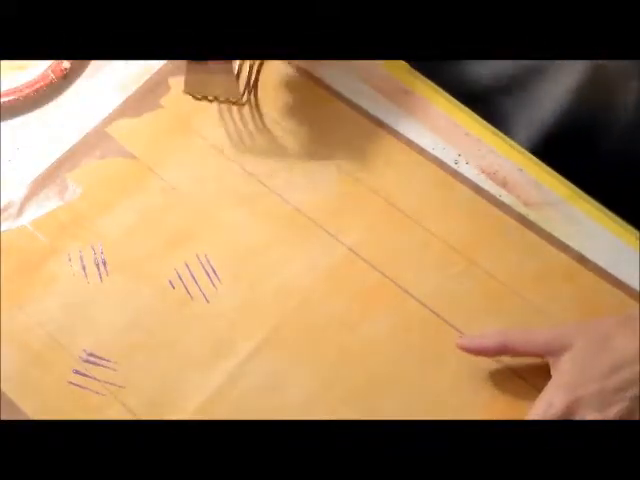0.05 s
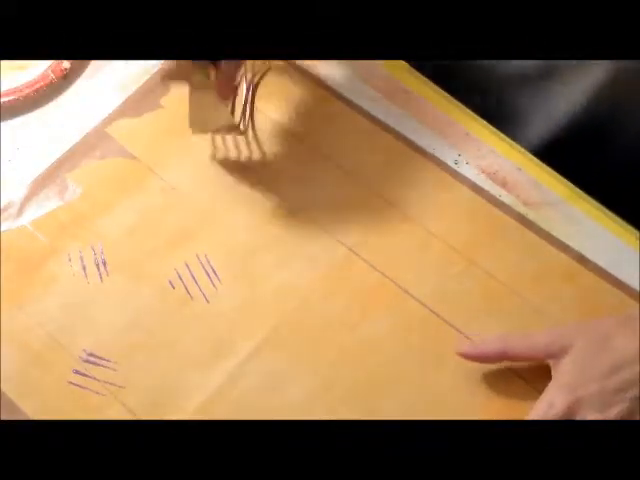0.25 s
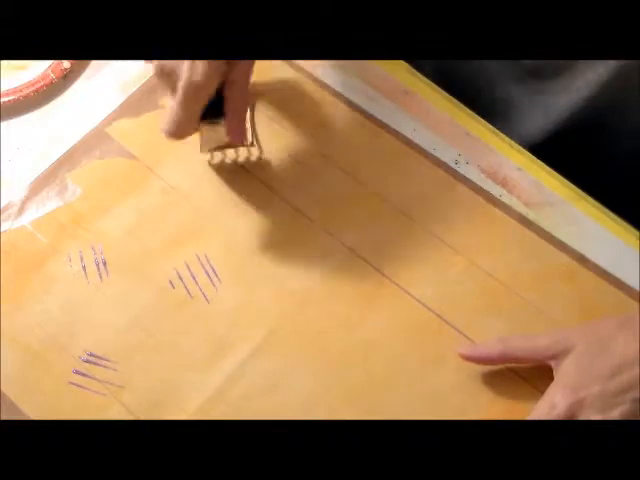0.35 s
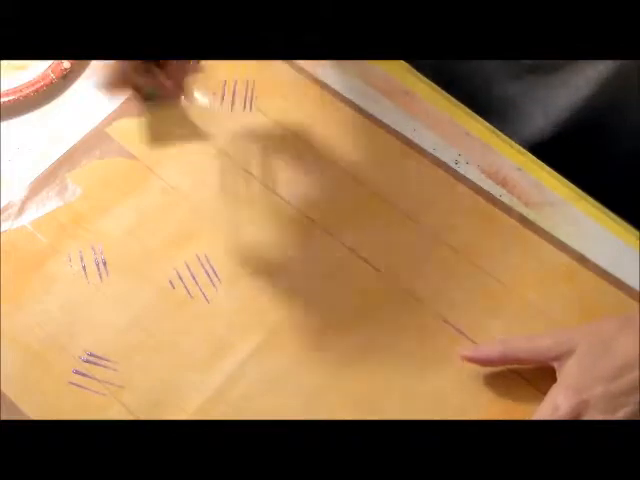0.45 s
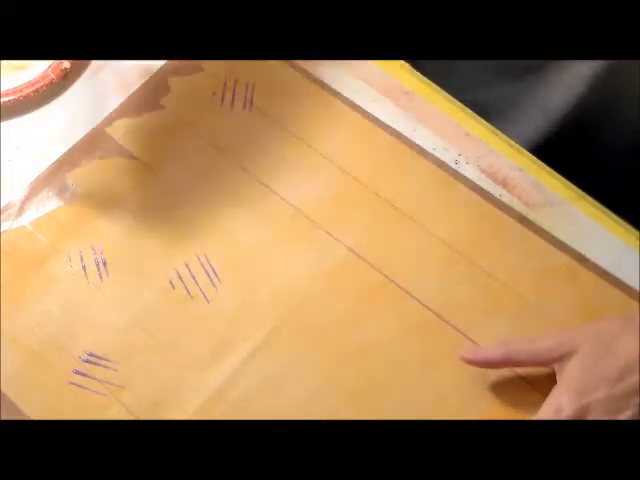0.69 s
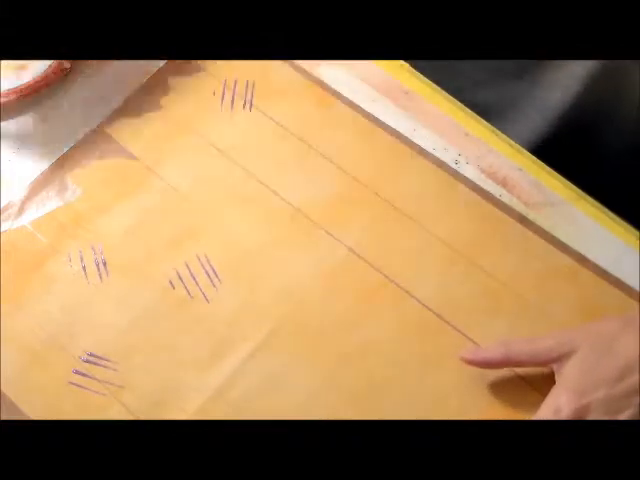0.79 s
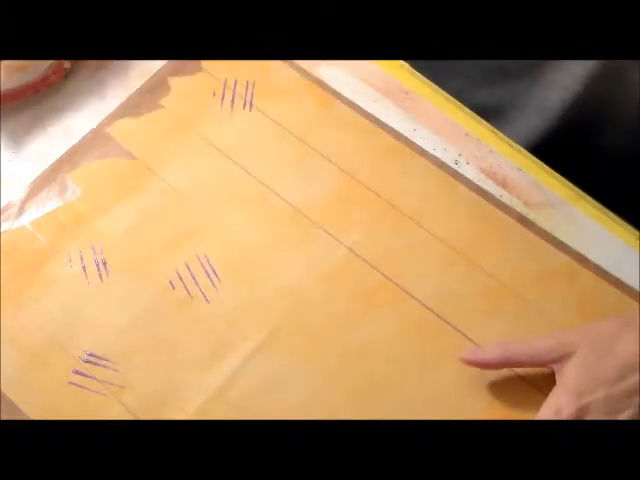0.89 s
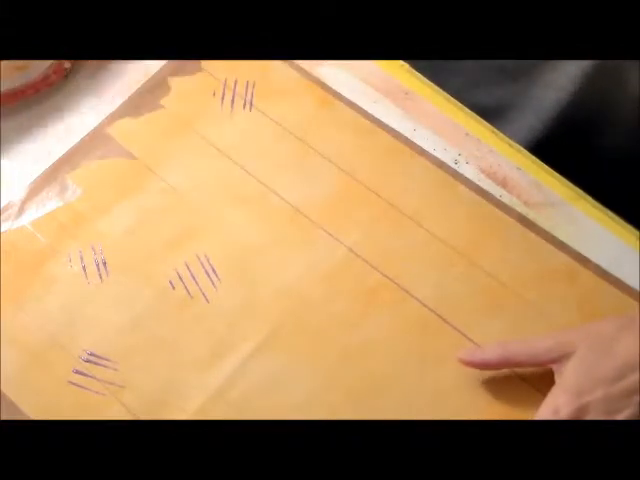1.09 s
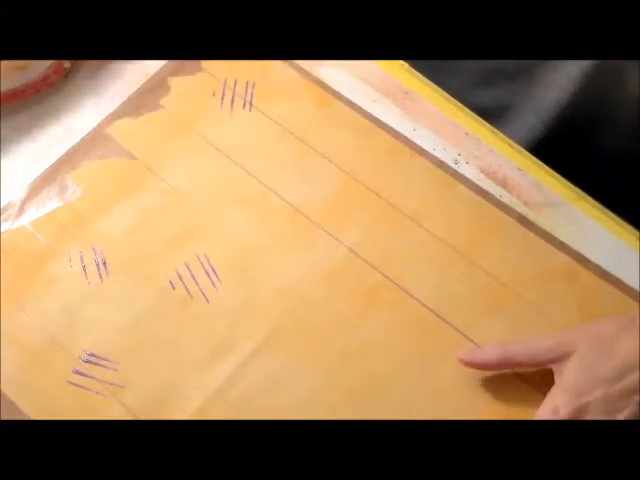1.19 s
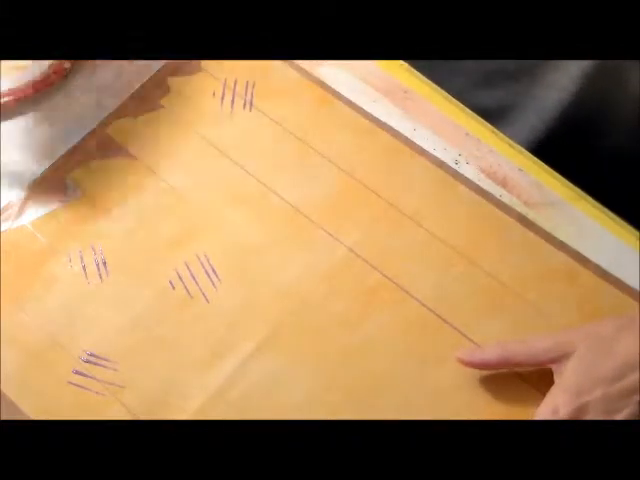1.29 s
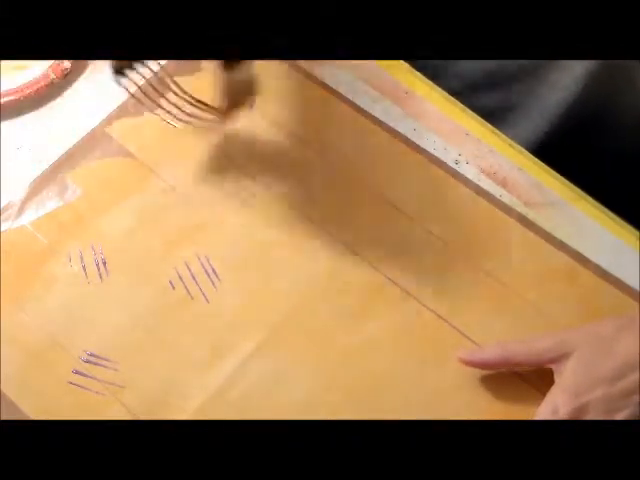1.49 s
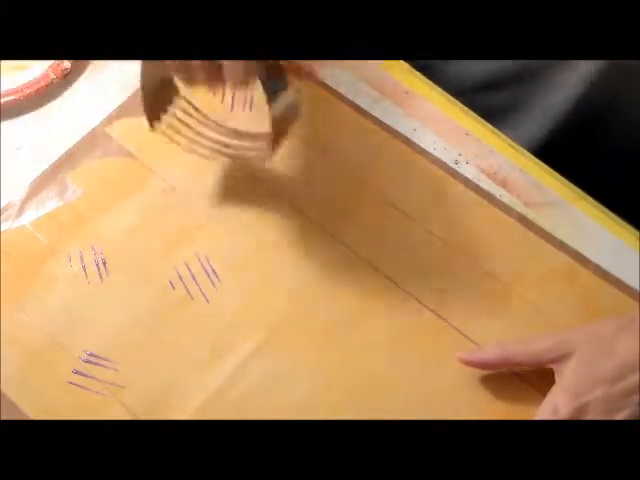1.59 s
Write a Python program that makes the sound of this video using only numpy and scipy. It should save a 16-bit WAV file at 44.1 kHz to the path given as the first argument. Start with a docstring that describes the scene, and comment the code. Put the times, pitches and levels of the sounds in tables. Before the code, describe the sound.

A metal hand tool with tines strikes a paper-covered table: a dull thump, small scattered ticks, then two sharper clattering blows close together, in a small room, miked close with camera hiss and motor chirps.

```python
"""From the start a camera adds hiss and rumble (shaped noise), hum, a thin sagging whine and short motor chirps.
At 0.21 s a metal hand tool is set down on a paper-covered table in a small room: the table thumps and rings.
Tines tick on the paper just before and after it (clicks with a little noise); the paper rustles (grainy noise).
Two more blows, at 1.09 s and 1.32 s, add the clatter of the tines, made of dying sine waves and noise.
The camera's gain control turns the sound down after the loud blows and lets it recover slowly."""
import sys
import numpy as np
from scipy import signal
from scipy.fft import rfft, irfft
from scipy.io import wavfile
from scipy.ndimage import uniform_filter1d

SR = 44100
rng = np.random.default_rng(int(sys.argv[2]) if len(sys.argv) > 2 else 0)


def materialize(psi):
    """Save the field psi as 16-bit PCM at rate SR to the path in sys.argv[1].

    A 1-D psi becomes a single channel; in a 2-D psi each row is a channel.
    """
    bounded = np.clip(np.atleast_2d(psi).T, -1, 1)
    quanta = np.round(bounded * 32767).astype(np.int16)
    wavfile.write(sys.argv[1], SR, quanta)


def gain_from_db(level_db):
    """Convert decibel levels to linear amplitude factors (20 dB per decade)."""
    decades = np.asarray(level_db, float) / 20
    return 10 ** decades


N = 72765  # length of the scene in samples

# Colour of hiss and rumble: (frequency [Hz], relative level [dB])
AIR_COLOUR = [(12, -13.5), (20, 5), (54, -8), (191, -14), (231, -22), (331, -17), (557, -28), (605, -25.5),
              (1080, -29.5), (5170, -33.5), (14300, -39)]
# How alike the hiss is in both ports: (frequency [Hz], likeness [-1 to 1])
AIR_LIKENESS = [(60, 1), (130, 0.15), (290, 0.26), (640, 0.44), (1400, 0.25), (3090, -0.059), (6790, -0.19),
                (14900, 0.29)]
# Balance of the hiss: (frequency [Hz], left minus right [dB])
AIR_BALANCE = [(60, 10), (110, 11.5), (200, -2), (380, 2), (700, -0.5), (1290, -0.5), (2370, -0.5),
               (4380, 3.5), (8090, -0.5), (14900, 1)]
AIR_DB, AIR_EDGE_HZ = -49.5, 14300  # the hiss stops at the edge

# Wavering low hum lines: (frequency [Hz], level [dB], width of the narrower of two resonances [Hz])
HUM_LINES = [(420, -77, 5.5), (148.6, -66.5, 6), (197, -77, 35), (275.3, -71, 32)]
# Loudness of a steadier hum line: (time [s], level [dB])
DRONE_LEVEL = [(0, -82), (.3, -71), (.65, -66), (.8, -63), (1.05, -61), (1.3, -69), (1.5, -79),
               (1.65, -111)]
DRONE_HZ, DRONE_WAVER_HZ = 339.2, 1.6

# Stretches of whine: (start [s], end [s], level [dB])
WHINES = [(0.033, 0.24, -76), (0.267, .36, -77), (0.645, 1.02, -73.5)]
WHINE_START_HZ, WHINE_SAG_HZ_PER_S, WHINE_WAVER_HZ = 5365, 190, 8

# Motor steps: (time [s], level [dB])
MOTOR_STEPS = [(0.0336, -56.5), (0.1476, -82), (0.286, -63.5), (0.4312, -58), (0.901, -57), (0.9662, -60.5),
               (1.033, -59), (1.1667, -63), (1.2333, -58), (1.634, -58)]
# The tones in one chirp: (frequency [Hz], level against the step [dB], length [s])
CHIRP_TONES = [(2886, 4, 0.015), (3850, -4.5, 0.044)]

# Light ticks of single tines:
# (time [s], level before an 8 dB lift [dB], centre [Hz], width of the narrower of two resonances [Hz])
TINE_TICKS = [(0.2051, -44.5, 3580, 1430), (0.213, -45, 3630, 900), (0.4158, -56, 3960, 2500),
              (0.4534, -54, 5000, 6400), (0.5302, -47.5, 4400, 1070), (0.5936, -43, 3230, 790),
              (0.5932, -50, 2560, 500), (.5943, -44, 4400, 1240), (0.596, -50, 1700, 780),
              (0.6029, -42, 2600, 1800), (0.6325, -45, 2980, 600), (0.6325, -46, 4130, 1500),
              (.648, -39.5, 13600, 5900), (1.088, -46, 3400, 2490), (1.1863, -51, 3300, 700)]
TICK_FADE_S = 0.0021  # for a tick at 3500 Hz; higher ticks fade faster
TICK_GRIT = 0.29  # noise that follows the first contact

# Blows on the table: (time [s], thump [dB], knock [dB], clatter [dB], board tuning [ratio])
TABLE_BLOWS = [(0.2117, -22, -29, -64, .95), (1.0926, -22.5, -32, -31.5, 1.),
               (1.3184, -18, -22.5, -30, 1.02)]
# Table rocking on its legs: (frequency before tuning [Hz], level against the thump [dB], time to fall 60 dB [s])
ROCKING_MODES = [(46.5, 5, 0.21), (32.17, -9, 0.79), (66, -2, 0.19)]
ROCKING_RISE_S, ROCKING_CREST_S = 0.02, 0.0193  # build-up time; shared crest, counted from the blow
# Table frame: (frequency before tuning [Hz], level against the knock [dB], time to fall 60 dB [s])
FRAME_MODES = [(121, -0.5, 0.176), (185, -1, 0.1), (215.9, -6.5, 0.24)]
# Table top: (frequency before tuning [Hz], level against the knock [dB], time to fall 60 dB [s])
BOARD_MODES = [(364, -5, 0.033), (441.6, -0.5, 0.089), (554, -11.5, 0.076), (650, -17.5, 0.1),
               (759.4, -14.5, 0.14), (1132, -13, 0.052)]
# Colour of the dull part of the knock: (frequency [Hz], relative level [dB])
KNOCK_COLOUR = [(150, -14), (250, -7.5), (443, 3), (563, -7.5), (1270, -12), (1550, -13), (2180, -15.5),
                (6000, -39), (7800, -74), (13200, -120)]
KNOCK_SNAP_DB, KNOCK_SNAP_T60_S = -10.5, 0.24
# The tool, damped by the paper:
# (frequency before tuning [Hz], level before strike strength [dB], time to fall 60 dB [s])
TINE_MODES = [(1896, -1.5, .02), (2430, -28, 0.023), (3325, 7, 0.018), (4400, 1.5, 0.034),
              (4760, -4, 0.031), (8560, -12.5, 0.035), (9650, -6, .012)]
CLATTER_FADE_S, CLATTER_PER_S, CRACK_DB = 0.0035, 1800, 1.5  # the tines land one after another
FIRST_TINE, FIRST_TINE_S = 0.83, 0.001301  # strength and delay of the leading tine
# Colour of the broad snap of paper and metal: (frequency [Hz], relative level [dB])
CRACK_COLOUR = [(290, -63), (500, -3), (900, -30.5), (1690, -7), (1980, -13.5), (3460, -13), (6510, -22.5),
                (10000, -15.5), (13300, -19.5), (15400, -66)]

# Pitched after-rings, some time after a blow: (start [s], length [s], frequency [Hz], level [dB])
AFTER_RINGS = [(.255, 0.031, 420, -44), (1.115, 0.051, 443, -41.5), (1.348, 0.073, 463, -37.5),
               (1.42, 0.15, 501, -59.5)]
# Paper settling: (start [s], length [s], level [dB])
PAPER_RUSTLES = [(1.184, 0.038, -53), (.415, 0.068, -59.5)]
# Soft low bump as the tool lifts: (start [s], length [s], frequency [Hz], level [dB])
LIFT_BUMPS = [(.435, 0.091, 66.3, -43)]

THUMP_LEAN_DB, FRAME_LEAN_DB, KNOCK_LEAN_DB = 11.5, 7, 1.1  # left minus right
RIGHT_LAG_S, THUMP_LAG_S = 0.000022, 0.00086  # the thump comes through the mount, unevenly

# How long the room echoes: (frequency [Hz], time to fall 60 dB [s])
ROOM_DECAY = [(250, 0.46), (660, 0.28), (1740, 0.18), (4590, 0.22), (12100, 0.16)]
ROOM_DB, ROOM_LIKENESS = -0.5, 0.66  # send level of the clatter; how alike the echoes are left and right
METAL_ROOM_DB = -11  # the damped tine ring stays near the table; the snap fills the room
TICK_ROOM_DB, KNOCK_ROOM_DB = -14, -14.5
GAIN_KNEE_DB, GAIN_SHARE, GAIN_RECOVERY_DB_PER_S, GAIN_SMOOTH_S = -28, 0.85, 4, 0.13
BAND_EDGE_HZ = 15300


def evened(x):
    """Brings a sound to an average (RMS) level of 1."""
    return x / np.sqrt(np.mean(x ** 2) + 1e-20)


def read(points, hz):
    """Reads a curve between its points, on a logarithmic frequency scale."""
    f, value = np.transpose(points)
    return np.interp(np.log(hz + 1), np.log(f + 1), value)


def add(mix, s, sound):
    """Adds a sound into the mix, starting at s seconds."""
    part = mix[round(s * SR):][:len(sound)]
    part += sound[:len(part)]


def resonate(x, hz, width):
    """A resonance of gain 1: it lets through the sound near one pitch."""
    turn = np.exp(2j * np.pi * np.cumsum(hz * np.ones(len(x))) / SR)
    r = np.exp(-np.pi * width / SR)
    return 2 * (turn * signal.lfilter([1 - r], [1, -r], x / turn)).real


def coloured(x, points):
    """Shapes a sound by a spectrum in dB."""
    hz = np.fft.rfftfreq(x.shape[-1], 1 / SR)
    return irfft(rfft(x) * gain_from_db(read(points, hz)), x.shape[-1])


def air():
    """Steady hiss over lumpy rumble: coloured noise, partly shared by the two ports."""
    hz = np.fft.rfftfreq(N, 1 / SR)
    a, b = rfft(rng.standard_normal((2, N)))
    same = np.clip(read(AIR_LIKENESS, hz), -1, 1)
    lean = gain_from_db(read(AIR_BALANCE, hz) / 2)  # half up on the left, half down on the right
    left = a * lean
    right = (same * a + np.sqrt(1 - same ** 2) * b) / lean
    colour = gain_from_db(read(AIR_COLOUR, hz)) / (1 + (hz / AIR_EDGE_HZ) ** 150)
    both = irfft(np.array([left, right]) * colour, N)
    return gain_from_db(AIR_DB) * both / np.sqrt(np.mean(both.mean(0) ** 2))


def slow_waver():
    """Twice-smoothed noise that makes a pitch wander."""
    return evened(uniform_filter1d(uniform_filter1d(rng.standard_normal(N), 900), 900))


def camera_hum(waver):
    """Low hum: noise through narrow resonances, plus a steadier sine that swells and fades."""
    t = np.arange(N) / SR
    drone = np.sin(2 * np.pi * np.cumsum(DRONE_HZ + DRONE_WAVER_HZ * waver) / SR)
    out = gain_from_db(np.interp(t, *np.transpose(DRONE_LEVEL))) * evened(drone)
    for hz, db, width in HUM_LINES:
        line = resonate(resonate(rng.standard_normal(N), hz, width), hz, 2 * width)
        out += gain_from_db(db) * evened(line)
    return out


def camera_whine(waver):
    """A thin sine whose pitch sags and wavers, faded at both ends of each stretch."""
    out, t = np.zeros(N), np.arange(N) / SR
    for start, end, db in WHINES:
        hz = WHINE_START_HZ - WHINE_SAG_HZ_PER_S * (t - start) + WHINE_WAVER_HZ * waver
        tone = evened(np.sin(2 * np.pi * np.cumsum(hz) / SR))
        fade = np.clip(np.minimum(t - start, end - t) / 0.0061, 0, 1)
        out += gain_from_db(db) * tone * fade
    return out


def motor_chirps():
    """Each motor step is a pair of short sines that swell quickly and then fade."""
    out = np.zeros(N)
    for s, db in MOTOR_STEPS:
        for hz, part_db, length in CHIRP_TONES:
            t = np.arange(0, length, 1 / SR)
            swell = np.sin(np.pi * (t / length) ** 0.2)
            add(out, s, gain_from_db(db + part_db) * swell * np.sin(2 * np.pi * hz * t))
    return out


def tine_ticks():
    """A tine touching paper: a click and a little noise through two resonances at one pitch."""
    out, t = np.zeros(N), np.arange(600) / SR
    for s, db, hz, width in TINE_TICKS:
        contact = TICK_GRIT * rng.standard_normal(len(t)) + (t == 0)
        burst = contact * np.exp(-t / TICK_FADE_S * np.sqrt(hz / 3500))
        tick = resonate(resonate(burst, hz, width), hz, 2 * width)
        add(out, s, gain_from_db(db + 8) * tick / abs(tick).max())
    return out


def ring(modes, tuning, crest_s=None):
    """The dying modes of a struck thing, starting from rest or all cresting at crest_s."""
    t = np.arange(SR // 2) / SR
    out = np.zeros(len(t))
    for hz, db, t60 in modes:
        pitch = hz * tuning
        crest = crest_s or 1 / (4 * pitch)  # a quarter turn makes the mode start from rest
        out += gain_from_db(db - 60 * t / t60) * np.cos(2 * np.pi * pitch * (t - crest))
    return out


def table_thump():
    """Each blow rocks the table on its legs; the low modes build up and die away."""
    out, t = np.zeros(N), np.arange(SR // 2) / SR
    for s, thump_db, _, _, _ in TABLE_BLOWS:
        rise = 1 - np.exp(-t / ROCKING_RISE_S)
        add(out, s, gain_from_db(thump_db) * ring(ROCKING_MODES, 0.93, ROCKING_CREST_S) * rise)
    return out


def frame_ring():
    """Each blow makes the table frame ring in a few low modes."""
    out = np.zeros(N)
    for s, _, knock_db, _, _ in TABLE_BLOWS:
        add(out, s, gain_from_db(knock_db) * ring(FRAME_MODES, 0.94))
    return out


def board_knock():
    """Each blow rings the table top, with a dull burst of fading noise."""
    out, t = np.zeros(N), np.arange(SR // 2) / SR
    for s, _, knock_db, _, tuning in TABLE_BLOWS:
        noise = evened(coloured(rng.standard_normal(len(t)), KNOCK_COLOUR))
        snap = noise * gain_from_db(KNOCK_SNAP_DB - 60 * t / KNOCK_SNAP_T60_S)
        onset = np.minimum(t / 0.00057, 1)
        add(out, s, gain_from_db(knock_db) * (ring(BOARD_MODES, tuning) + snap * onset))
    return out


def tine_clatter():
    """Tines landing at random times ring the tool, under a broad crack; returns near sound and room send."""
    near, far, t = np.zeros(N), np.zeros(N), np.arange(SR // 2) / SR
    fall = np.exp(-t / CLATTER_FADE_S) * np.minimum(t / 0.00082, 1)
    for s, _, _, clatter_db, _ in TABLE_BLOWS:
        hits = rng.random(len(t)) < CLATTER_PER_S / SR
        lands = rng.standard_normal(len(t)) * hits * fall
        strikes = lands / np.linalg.norm(lands)
        metal = 0.46 * signal.fftconvolve(strikes, ring(TINE_MODES, 0.99))[:len(t)]
        add(metal, FIRST_TINE_S, FIRST_TINE * ring(TINE_MODES, 1))
        crack = gain_from_db(CRACK_DB) * evened(coloured(rng.standard_normal(len(t)), CRACK_COLOUR)) * fall
        add(near, s, gain_from_db(clatter_db) * (metal + 2 * crack))
        # the crack sent to the room is shorter
        add(far, s, gain_from_db(clatter_db) * (gain_from_db(METAL_ROOM_DB) * metal + 3 * crack * fall))
    return near, far


def swells(rows):
    """Sine tones that swell quickly and fade more slowly: after-rings and lift bumps."""
    out = np.zeros(N)
    for s, length, hz, db in rows:
        t = np.arange(0, length, 1 / SR)
        swell = np.sin(np.pi * (t / length) ** 0.66)
        add(out, s, gain_from_db(db) * swell * np.sin(2 * np.pi * hz * t))
    return out


def paper_rustle():
    """Settling paper: noise grains of very uneven strength, in the colour of the crack."""
    out = np.zeros(N)
    for s, length, db in PAPER_RUSTLES:
        n = round(length * SR)
        grains = rng.standard_normal(n) * gain_from_db(3.4 * rng.exponential(1, n))
        add(out, s, gain_from_db(db) * evened(coloured(grains, CRACK_COLOUR)) * np.hanning(n) ** 0.5)
    return out


def ports(x, lean_db, lag_s=RIGHT_LAG_S):
    """Two microphone ports: the left is louder by lean_db and the right hears a little later."""
    hz = np.fft.rfftfreq(N, 1 / SR)
    late = irfft(rfft(x) * np.exp(-2j * np.pi * hz * lag_s), N)
    return np.array([x * gain_from_db(lean_db), late]) * 2 / (1 + gain_from_db(lean_db))


def room(x):
    """Dense echoes of random sign, each band dying at its own speed."""
    taps = rng.standard_normal((2, SR // 2)) * (rng.random((2, SR // 2)) < 0.06)
    taps[1] = ROOM_LIKENESS * taps[0] + np.sqrt(1 - ROOM_LIKENESS ** 2) * taps[1]
    hz, t, z = signal.stft(taps, SR, nperseg=256)
    decay = gain_from_db(-60 * t / read(ROOM_DECAY, hz)[:, None])
    tail = signal.istft(z * decay, SR, nperseg=256)[1]
    tail = tail * (np.arange(tail.shape[1]) > 120)  # no echo in the first samples
    return signal.fftconvolve(x[None], tail / np.linalg.norm(tail[0]), axes=1)[:, :N]


def scene():
    """Adds the camera's own noise, the sounds at the table and their echoes."""
    waver = slow_waver()
    camera = camera_hum(waver) + camera_whine(waver) + motor_chirps()
    light = tine_ticks() + paper_rustle()
    knock = board_knock()
    clatter, far = tine_clatter()
    direct = ports(table_thump() + swells(LIFT_BUMPS), THUMP_LEAN_DB, THUMP_LAG_S)
    direct = direct + ports(frame_ring(), FRAME_LEAN_DB) + ports(clatter + light, 0)
    direct = direct + ports(knock + swells(AFTER_RINGS), KNOCK_LEAN_DB)
    sent = gain_from_db(ROOM_DB) * far + gain_from_db(TICK_ROOM_DB) * light + gain_from_db(KNOCK_ROOM_DB) * knock
    early = np.arange(N) < 1.25 * SR
    echoes = room(sent * early) + room(sent * ~early)  # sounds after 1.25 s get a freshly drawn echo pattern
    return direct + echoes + camera + air()


def top_cut(x):
    """Nothing passes above the cut-off."""
    return signal.sosfilt(signal.butter(12, 15530, fs=SR, output="sos"), x)


def record(dry):
    """Gain control sinks after loud blows and recovers slowly; then the top treble is cut."""
    span = round(GAIN_SMOOTH_S * SR)
    power = np.convolve((dry ** 2).mean(0), np.ones(2000) / 2000)[:N]
    power_db = 10 * np.log10(power + 1e-12)
    # hold the loudest level so far, letting it sink steadily
    recovery = np.arange(N) * GAIN_RECOVERY_DB_PER_S / SR
    held_db = np.maximum.accumulate(power_db + recovery) - recovery
    over_db = np.maximum(held_db - GAIN_KNEE_DB, 0)
    smooth_db = signal.fftconvolve(over_db, np.ones(span) / span)[:N]
    ducked = dry / gain_from_db(GAIN_SHARE * smooth_db)
    limited = signal.oaconvolve(ducked, signal.firwin(101, BAND_EDGE_HZ, fs=SR)[None], "same")
    return top_cut(limited)


dry = scene()
out = record(dry)
materialize(out)
```